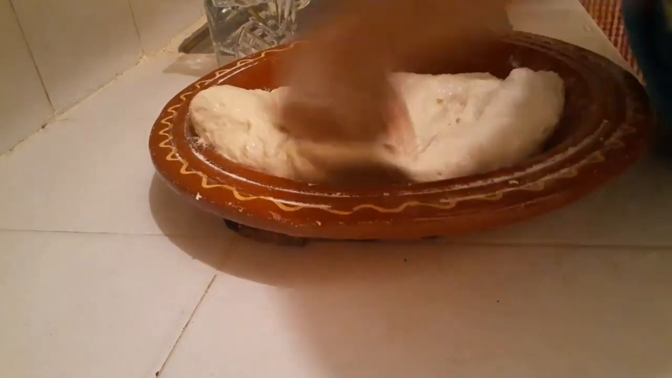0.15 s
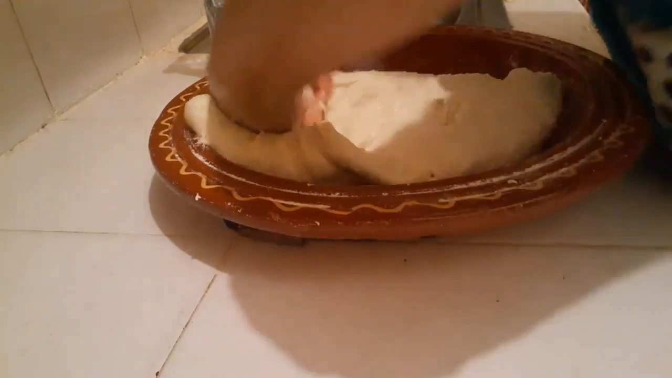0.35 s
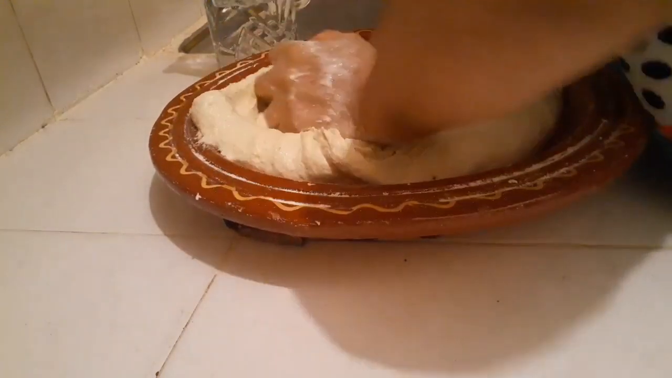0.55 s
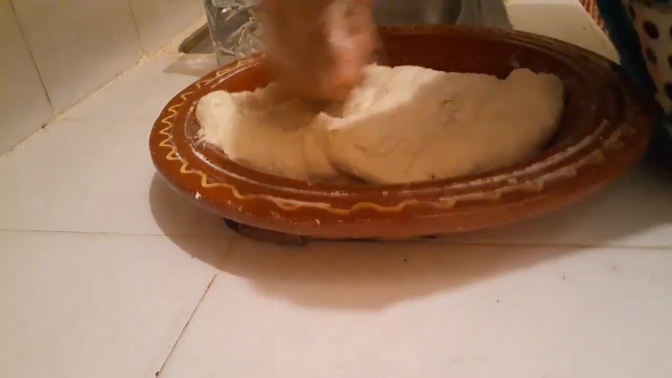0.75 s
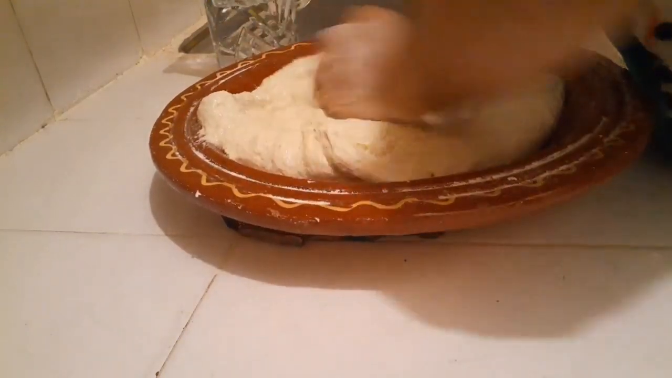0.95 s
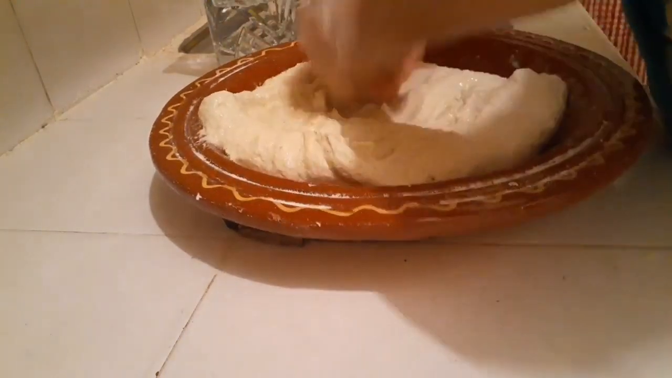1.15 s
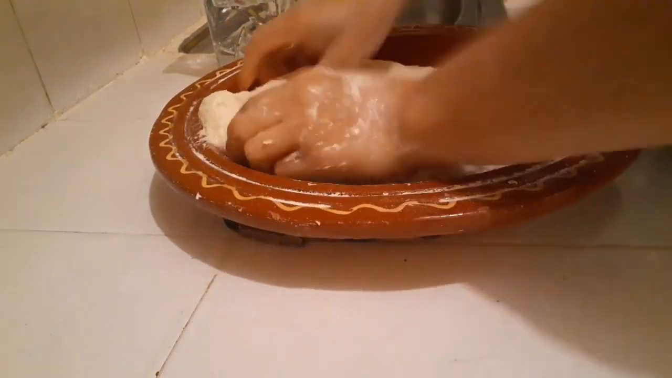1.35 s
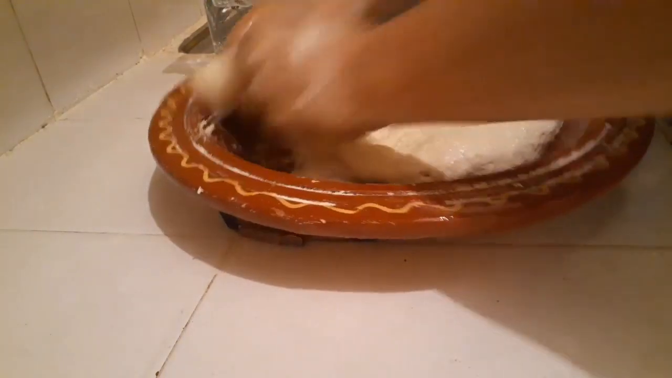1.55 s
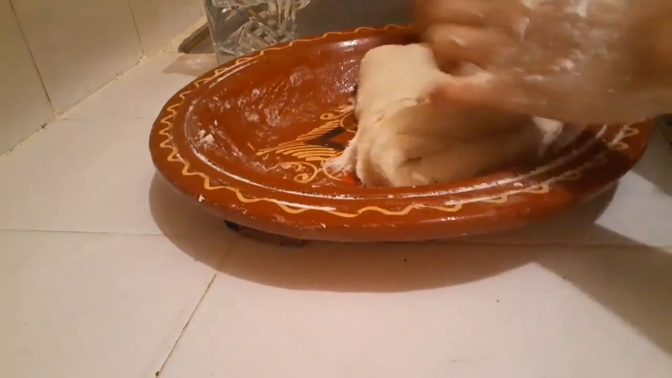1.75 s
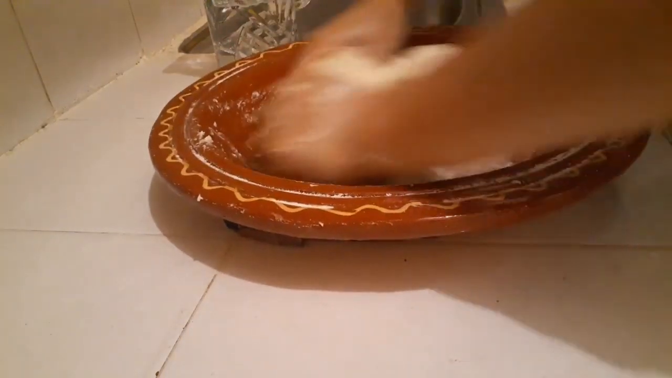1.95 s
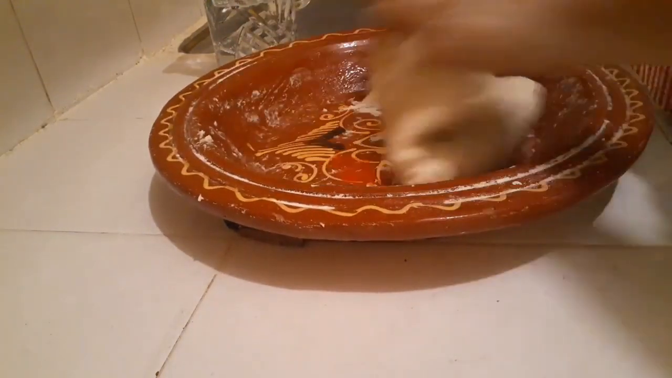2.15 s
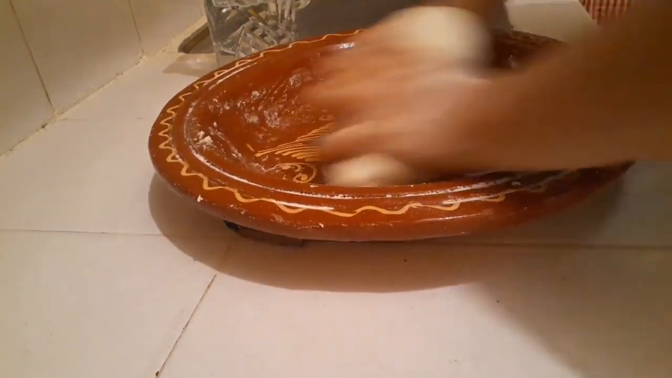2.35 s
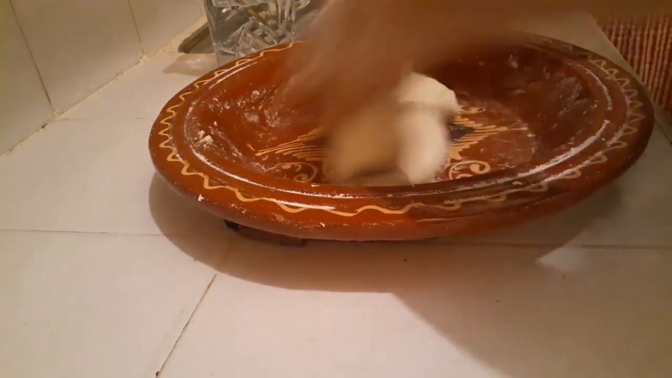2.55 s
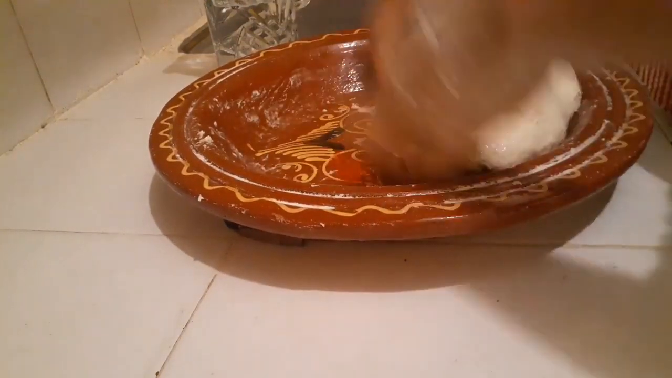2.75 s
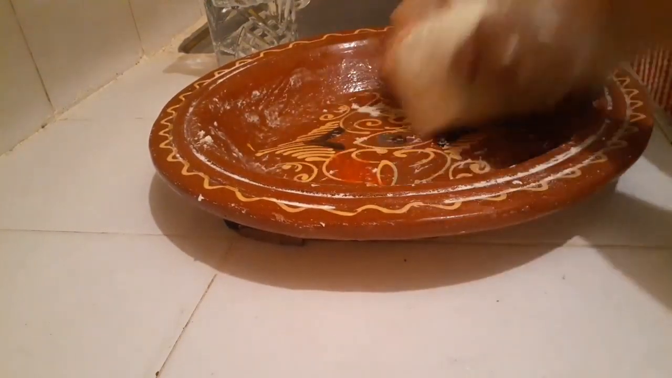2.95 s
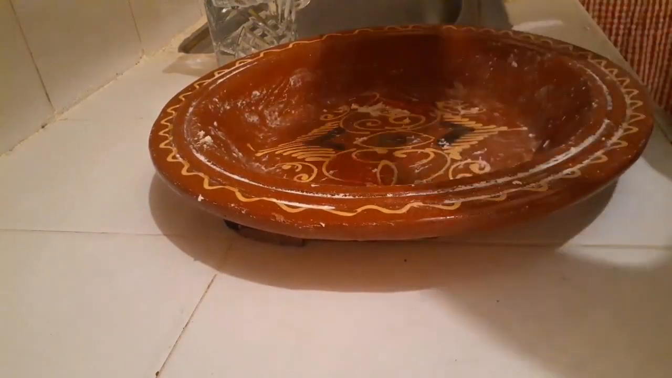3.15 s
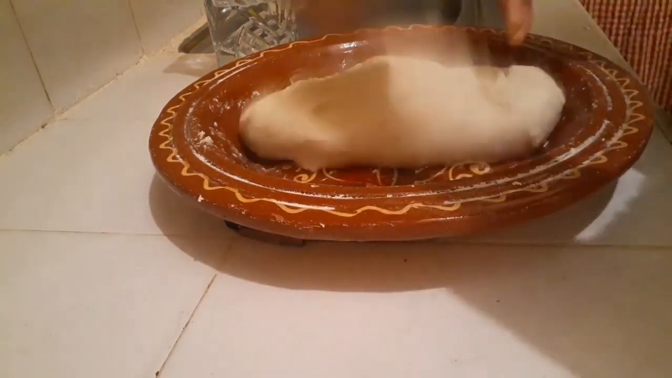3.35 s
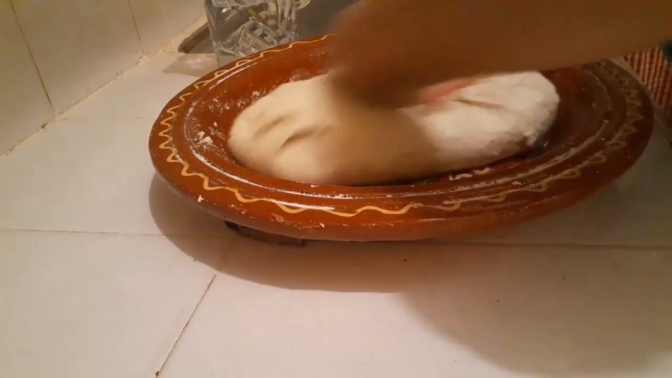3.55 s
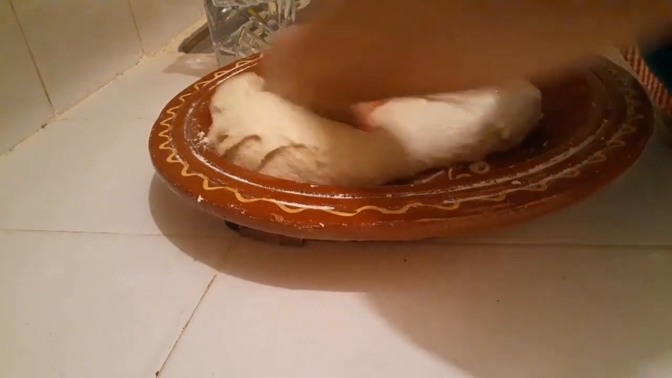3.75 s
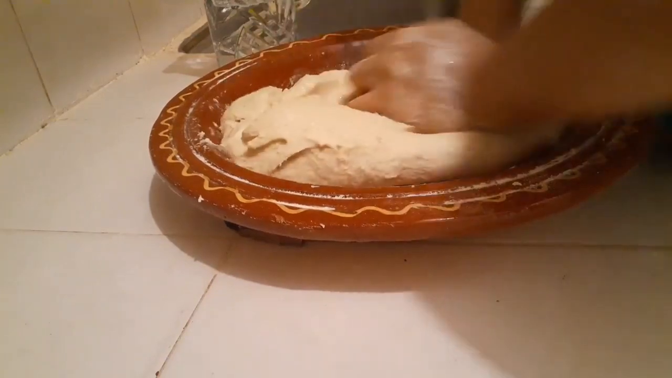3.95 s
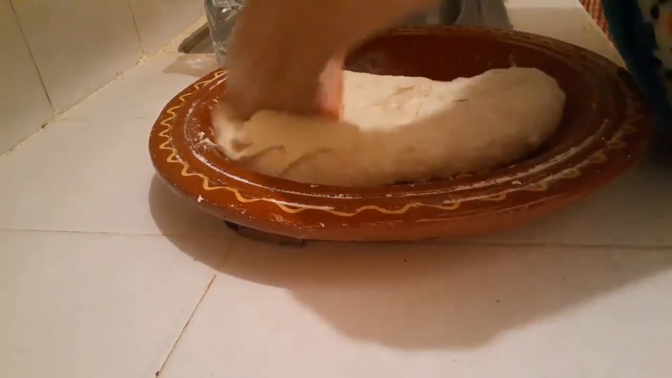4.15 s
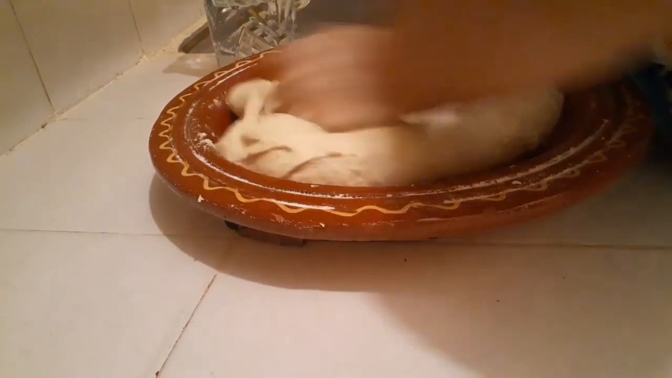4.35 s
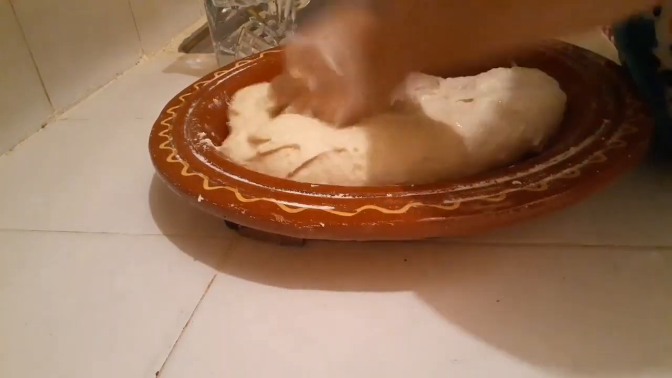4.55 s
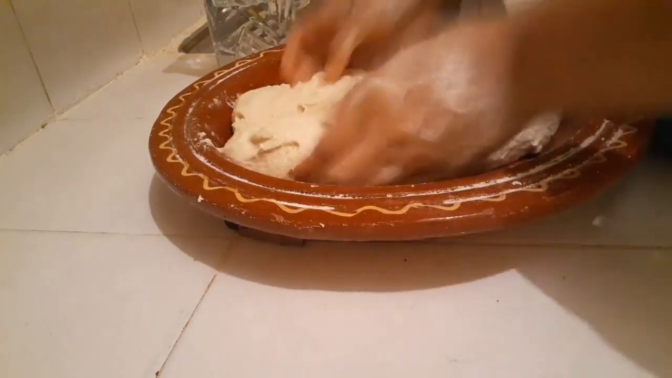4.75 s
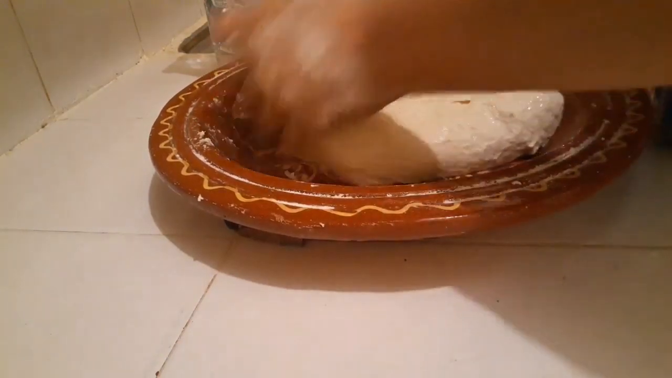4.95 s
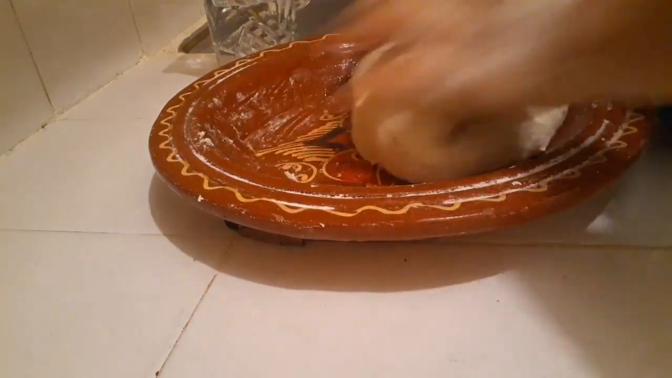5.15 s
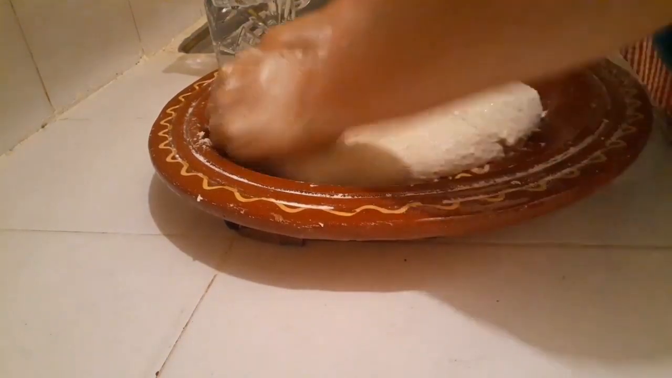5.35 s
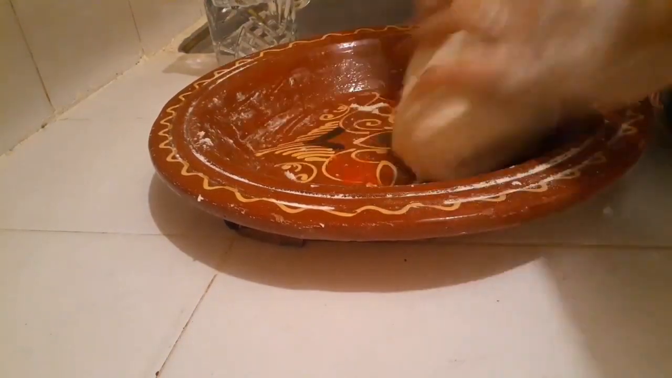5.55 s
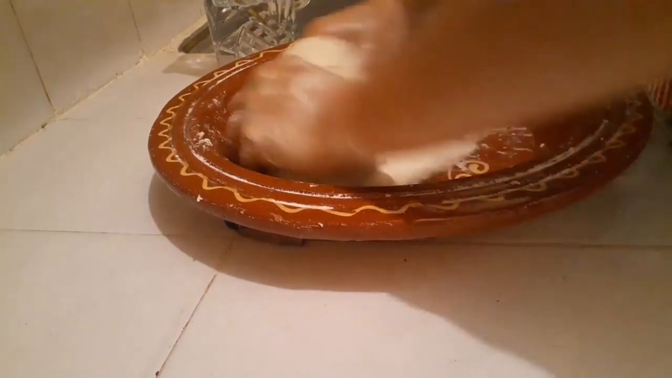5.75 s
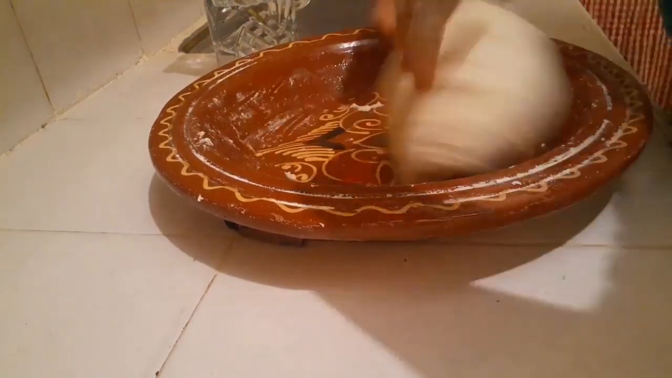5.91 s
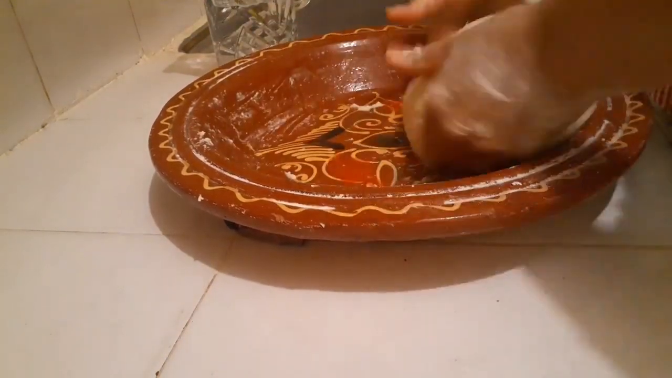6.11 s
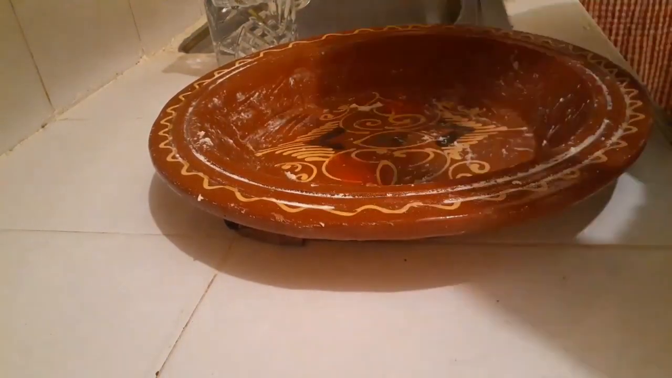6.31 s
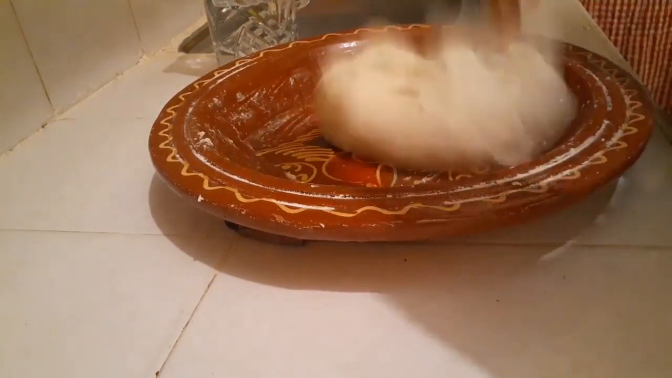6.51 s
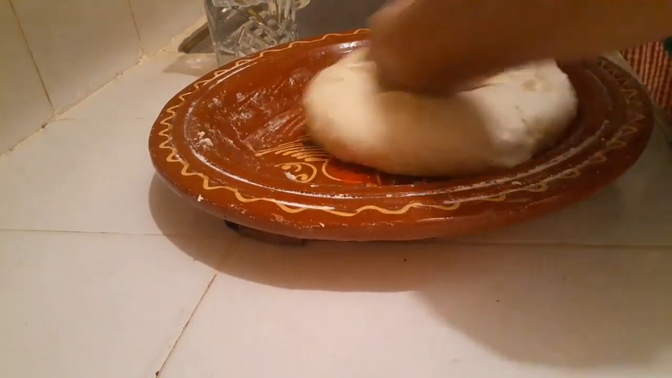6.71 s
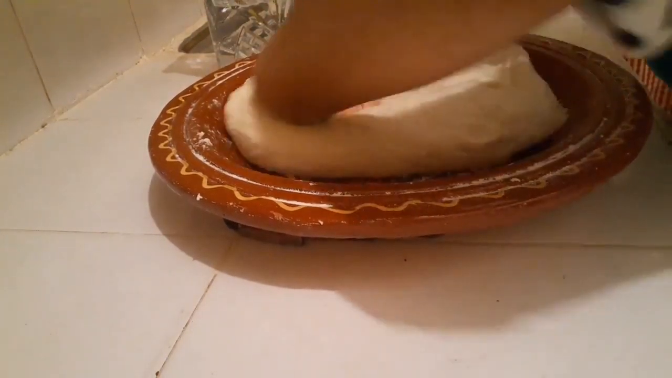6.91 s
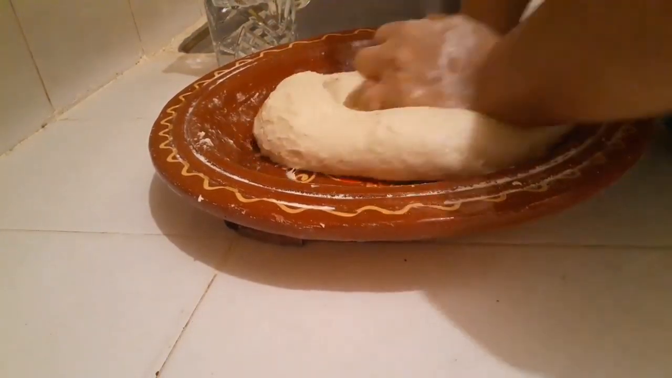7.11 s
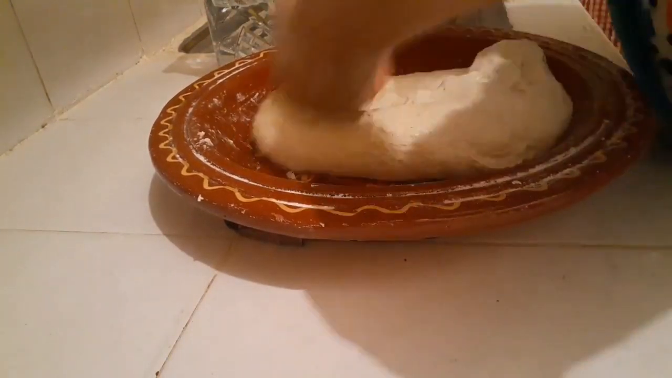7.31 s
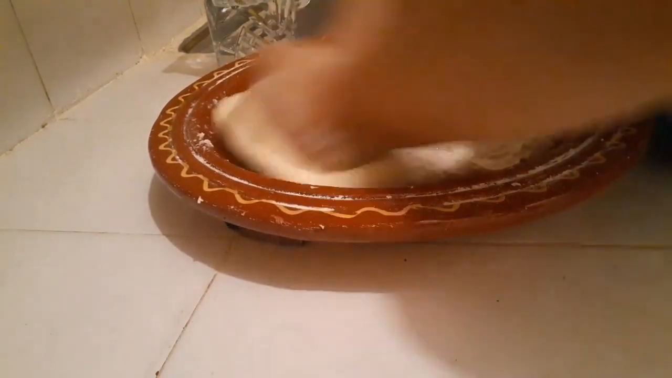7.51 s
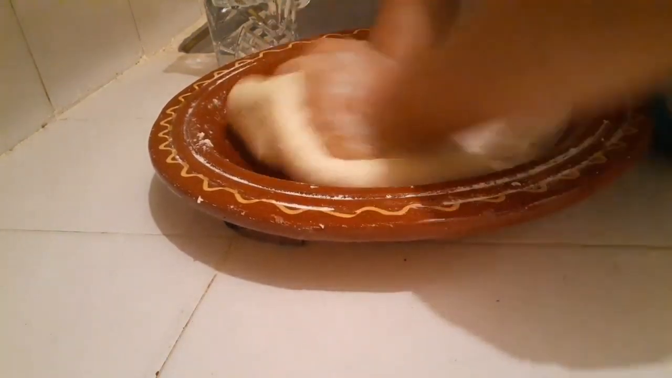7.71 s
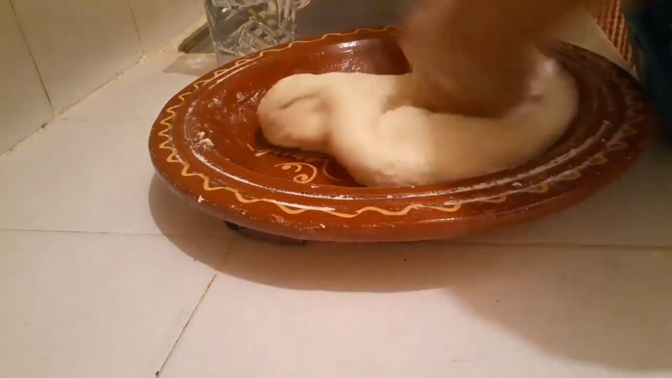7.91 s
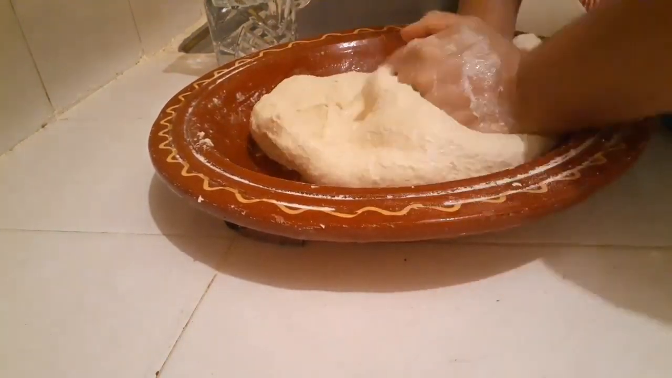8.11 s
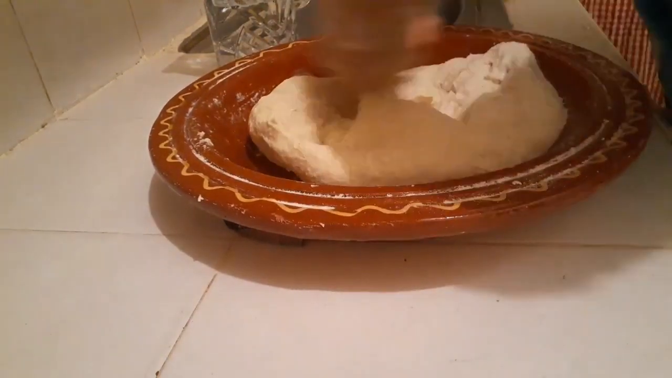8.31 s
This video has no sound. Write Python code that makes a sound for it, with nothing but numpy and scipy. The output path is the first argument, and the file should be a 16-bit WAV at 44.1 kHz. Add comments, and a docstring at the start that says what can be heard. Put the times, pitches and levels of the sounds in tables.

```python
"""Kneading sticky dough

Hands work dough in a clay dish on a tiled kitchen counter, close to a small camera's microphone.
Each stroke peels the dough with a fine crackle, a wet squelch and a few snaps. Fists and the dropped
lump thump the dish, and a palm rubs the glaze. Tiles and walls answer over a faint kitchen hush."""
import sys
import numpy as np
from scipy import signal
from scipy.fft import rfft, irfft, next_fast_len
from scipy.io import wavfile
from scipy.ndimage import uniform_filter1d

SR = 44100
rng = np.random.default_rng(int(sys.argv[2]) if len(sys.argv) > 2 else 0)


def unload_wav(signal):
    """Save mono or channel-first audio to the path in sys.argv[1] as 16-bit WAV at rate SR, clipped to [-1, 1]."""
    wavfile.write(
        sys.argv[1],
        SR,
        np.round(np.clip(np.atleast_2d(signal).T, -1, 1) * 32767).astype(np.int16),
    )


N = 373527

# room modes below 250 Hz, modes of the dish above: f/Hz, level/dB, t60/s
MODES = [(87.36, 0, 0.98), (109, -12, 0.99), (140.8, -2, 0.44), (184.8, -3, 0.4), (233.4, -4.5, 0.15),
         (293.2, -17, 0.7), (339, -1, 0.2), (387.4, -3, 0.12), (434, 0, 0.075), (482.7, -4, 0.14),
         (542.4, 2.5, 0.081), (641.7, -5, 0.18), (736, -1, 0.074), (853.6, 1.5, 0.081), (917, 0.5, 0.075),
         (1148, 1.5, 0.061), (1220, -4, 0.055), (1346, -5, 0.11), (1560, -8.5, 0.12), (1937, -5.5, 0.029),
         (2240, -14, 0.082)]
# bright spectrum of tearing dough: f/Hz, level/dB
PEEL_SPECTRUM = [(1500, -23.5), (3000, -16), (6000, -8.5), (12000, -4.5), (16000, -1)]


def amp(db):
    """Gain of a dB value."""
    return 10 ** (np.asarray(db) / 20)


def unit(x):
    """Scaled to rms 1."""
    return x / np.sqrt(np.mean(x ** 2) + 1e-20)


def along(points, hz):
    """A curve through (frequency, value) points, read on a log axis."""
    f, v = np.transpose(points)
    return np.interp(np.log(hz + 1), np.log(f + 1), v)


def filtered(x, response):
    """x through a complex frequency response."""
    m = next_fast_len(N + SR)
    return irfft(rfft(x, m) * response(np.fft.rfftfreq(m, 1 / SR)), m)[..., :N]


def eq(x, curve, gain_db=0):
    """x coloured by a curve of f/Hz, level/dB."""
    return filtered(x, lambda hz: amp(along(curve, hz) + gain_db))


def stereo_noise(length=N):
    """White noise, independent left and right."""
    return rng.standard_normal((2, length))


def hush():
    """Faint, steady room tone."""
    spectrum = [(18, -38.5), (30, 1), (107, -4.5), (255, -10), (340, 2), (1030, -7), (7280, -20),
                (12000, -13.5), (14800, -18.5), (16500, -41)]  # the quiet kitchen: f/Hz, level/dB
    return amp(-71) * unit(eq(stereo_noise(), spectrum))


def stroke_envelopes():
    """Each stroke swells as the hand arrives, holds, then fades; overlapping strokes add in power."""
    # hand strokes: full contact t/s, approach/s, hold/s, peel/dB, squelch/dB, push/dB, rumble/dB
    gestures = [(0.0, 0.044, 0.0092, -48, -49, -51.5, -53), (0.134, 0.056, 0.055, -46, -42, -48.0, -55),
                (0.235, 0.11, 0.1, -77.5, -50, -56, -63), (0.407, 0.052, 0.029, -56.5, -60, -67, -71),
                (0.473, 0.021, 0.012, -39.5, -39.5, -52, -59), (0.647, 0.035, 0.024, -47.5, -55, -51, -57),
                (0.695, 0.016, 0.0088, -39, -39.5, -48, -59), (0.894, 0.45, 0.02, -58.5, -56.5, -61.5, -59),
                (0.945, 0.023, 0.0136, -35.5, -50, -55, -60), (1.026, 0.063, 0.031, -78, -63, -54.5, -47.5),
                (1.089, 0.03, 0.012, -60, -36.0, -42.5, -48.0),
                (1.144, 0.06, 0.017, -44.0, -45.5, -52, -47), (1.324, 0.15, 0.14, -65, -59.0, -54.5, -60),
                (1.542, 0.163, 0.05, -41.5, -47.5, -58, -66), (1.616, 0.033, 0.056, -46.5, -59, -27.5, -33),
                (1.727, 0.054, 0.0065, -51, -45, -38, -36.0),
                (1.896, 0.099, 0.063, -47.5, -47.5, -50.5, -48.5),
                (2.092, 0.19, 0.051, -44.5, -51.5, -59, -60), (2.359, 0.26, 0.071, -52.5, -59.5, -59, -60),
                (2.551, 0.16, 0.058, -43.5, -53, -57.5, -70), (2.677, 0.018, 0.024, -56, -50.0, -45, -46),
                (2.784, 0.026, 0.014, -64, -57, -55, -52), (2.919, 0.13, 0.092, -44.5, -49.5, -61.5, -63),
                (3.162, 0.18, 0.048, -55.5, -70.0, -63, -70), (3.268, 0.19, 0.049, -56.5, -80, -65, -72),
                (3.346, 0.0079, 0.08, -47, -48, -46, -32.5), (3.609, 0.23, 0.036, -58.0, -59.5, -69, -54.0),
                (3.806, 0.054, 0.0087, -43.0, -54, -62, -56), (3.848, 0.059, 0.01, -45, -43.5, -49, -47.5),
                (3.992, 0.045, 0.059, -46, -48, -56, -58), (4.183, 0.056, 0.015, -48, -52.5, -68, -83),
                (4.238, 0.046, 0.011, -48, -68.0, -81, -80),
                (4.324, 0.027, 0.028, -36, -43.5, -51.5, -52.5),
                (4.527, 0.047, 0.053, -48, -46.0, -51.5, -52.0),
                (4.744, 0.014, 0.04, -70, -63.5, -63, -57.5), (4.93, 0.22, 0.11, -48.5, -55.5, -59.5, -69),
                (5.234, 0.24, 0.017, -55.5, -56.5, -59.0, -61),
                (5.281, 0.11, 0.035, -48, -64, -52.5, -53.5), (5.427, 0.1, 0.057, -42.5, -50, -52, -61),
                (5.589, 0.058, 0.026, -63.0, -67.0, -57, -55),
                (5.648, 0.049, 0.0086, -44, -53.5, -58.5, -50),
                (5.723, 0.049, 0.018, -52.5, -67, -71.0, -59), (5.845, 0.1, 0.05, -41.0, -48, -60.0, -68.0),
                (5.95, 0.022, 0.043, -64, -57, -55, -54.0), (6.173, 0.19, 0.04, -48.5, -52.5, -61.5, -65),
                (6.338, 0.128, 0.036, -51, -58.5, -70, -75), (6.462, 0.086, 0.042, -48, -72, -79, -80),
                (6.52, 0.017, 0.038, -44.0, -40, -34.5, -41), (6.818, 0.7, 0.08, -60.5, -58, -59.5, -62),
                (7.013, 0.1, 0.019, -42.0, -41, -42, -48), (7.193, 0.032, 0.047, -45, -55, -57, -73),
                (7.366, 0.018, 0.11, -61.5, -61, -92, -73.0), (7.533, 0.039, 0.017, -34, -39.5, -51, -57),
                (7.73, 0.036, 0.056, -46.5, -46, -46, -47), (7.791, 0.14, 0.013, -41, -51, -60, -65),
                (8.029, 0.23, 0.065, -58.5, -78, -79.0, -67.5), (8.238, 0.036, 0.049, -43, -43, -45.5, -56),
                (8.402, 0.043, 0.046, -70, -52.5, -52.5, -59)]
    # fade after the hand lets go, each in dB/s: peel, squelch, push, rumble
    fade_rates = [260, 248, 212, 136]
    contact, approach, hold, *levels = np.transpose(gestures)[:, :, None]
    t = np.arange(0, N, 44) / SR
    swell_db = -30 * np.clip(contact - t, 0, None) / approach
    released_s = np.clip(t - contact - hold, 0, None)
    envelopes = []
    for db, fade in zip(levels, fade_rates):
        power = (amp(db + swell_db - fade * released_s) ** 2).sum(axis=0)
        envelopes.append(amp(np.interp(np.arange(N) / SR, t, 10 * np.log10(power + 1e-12))))
    return envelopes


def crackle(tears_per_s, spread_db, spectrum):
    """Tiny threads of dough tear at random, each a grain of noise heard on both sides at once."""
    tears = (rng.random(N) < tears_per_s / SR) * amp(spread_db * rng.standard_normal(N))
    grains = np.sqrt(np.abs(signal.lfilter([1], [1, -.95], tears ** 2)))
    return eq(grains * stereo_noise(), spectrum)


def patchy(x, depth_db):
    """Random passing patches, a few hundred Hz wide, colour the noise."""
    spectra = signal.stft(x, nperseg=256)[2]
    patches = uniform_filter1d(rng.standard_normal(spectra.shape[1:]), size=2, axis=0)
    patches = uniform_filter1d(patches, size=10, axis=1)
    return unit(signal.istft(spectra * amp(depth_db * unit(patches)), nperseg=256)[1][:, :N])


def dish(force):
    """A force on the dish rings the modes; the faster a mode dies, the broader it is."""
    def response(f):
        return sum((-1) ** k * amp(db) * 1j * f * 100
                   / (hz * hz - f * f + 1j * f * np.log(1000) / (np.pi * t60))
                   for k, (hz, db, t60) in enumerate(MODES))
    return filtered(force, response)


def strokes():
    """Dough peels and squelches while the hand's uneven push shakes dish and counter."""
    squelch_spectrum = [(300, -5), (800, 1.5), (1400, 2), (2400, 1.5), (4000, 0.5), (7000, -10),
                        (12000, -11.5)]  # squeezed wet dough: f/Hz, level/dB
    rumble_spectrum = [(40, -31), (70, -6.5), (86, -5.5), (130, -3.5), (183, -7.5), (240, -8.5), (300, -50)]  # the shaken counter: f/Hz, level/dB
    peel_gain, squelch_gain, push_gain, rumble_gain = stroke_envelopes()
    peel = patchy(crackle(tears_per_s=3500, spread_db=3.5, spectrum=PEEL_SPECTRUM), depth_db=2)
    squelch = patchy(crackle(tears_per_s=4000, spread_db=3, spectrum=squelch_spectrum), depth_db=4)
    force = filtered(stereo_noise(), lambda hz: (hz > 260) / (1 + (hz / 420) ** 2))
    push = unit(dish(force))
    rumble = unit(eq(stereo_noise(), rumble_spectrum))
    return peel_gain * peel + squelch_gain * squelch + push_gain * push + rumble_gain * rumble


def thumps():
    """Blows ring dish and room, dough damps the dish, wet skin splats. Returns ring, splat."""
    # fists and the dropped lump: t/s, boom/dB, low/dB, body/dB, upper body/dB, high ring/dB,
    # damping by dough/ratio, slap/dB, spray/dB
    blows = [(0.113, -56, -71, -47, -41, -43.5, 0.98, -58, -45),
             (0.655, -48, -53, -54, -46, -41, 1.2, -34.5, -32),
             (1.086, -48, -47, -35, -40, -37.5, 1.15, -32, -54),
             (1.614, -58, -22, -20.5, -15, -21.5, 1.32, -60, -48.5),
             (1.642, -40, -18.5, -21.5, -15.5, -41, 2.3, -59, -50),
             (1.735, -45.5, -40, -26, -28.5, -23.5, 2.9, -44, -56),
             (1.872, -63.5, -43, -35.5, -47, -41, 1.6, -35, -40),
             (2.353, -68, -65, -48, -59, -83, 0.65, -50, -43),
             (2.669, -56.5, -50, -34.5, -48, -43, 0.67, -36, -29.5),
             (2.788, -52, -51.5, -40.5, -52, -54, 2, -55, -44),
             (3.34, -57.5, -43, -26.5, -27.5, -51, 0.59, -48, -42),
             (3.348, -37.5, -22, -29, -36, -18, 3.7, -17.5, -12.5),
             (3.352, -33, -36, -16.5, -20.5, -13, 1.67, -10.5, -18.5),
             (3.992, -75, -57, -42, -49, -55, 1.9, -34.5, -51),
             (4.524, -57.5, -44, -32.5, -37, -48.5, 1.44, -34.5, -37.5),
             (4.745, -68, -61.5, -53, -59, -65.5, 0.59, -47.5, -53),
             (4.948, -73.5, -62.5, -48.5, -56, -41, 1.4, -48, -56),
             (5.281, -69, -47, -55, -58, -54, .6, -62, -58), (5.582, -68, -46, -47, -66, -66, .6, -71, -60),
             (5.946, -56, -73, -60, -55, -48, 0.65, -39, -36.5),
             (6.508, -43, -32, -39, -52, -44, 3, -19.5, -14),
             (6.512, -28, -24.5, -24.5, -30, -15.5, 1.3, -12, -31.5),
             (6.998, -54, -44, -36, -43, -37.5, 1.06, -38, -38),
             (7.367, -77, -75, -77, -88, -57, 0.77, -44.5, -58),
             (7.542, -56, -45, -45.5, -46, -57, 0.73, -41, -39),
             (7.723, -52, -41, -32.5, -53, -61, 1.17, -47, -54.5),
             (8.221, -60.5, -46.5, -35, -55, -38, 1.3, -57, -57),
             (8.396, -58.5, -56, -45.5, -62, -50, 1.8, -43, -48)]
    band_centres = [95, 185, 336, 550, 1300]  # the five bands from boom to high ring: f/Hz
    hz, mode_db, t60 = np.transpose(MODES)[:, :, None]
    t = np.arange(SR * 3 // 4) / SR
    is_room_mode = hz < 250  # low room modes build up slowly and boom on
    rise = 1 - np.exp(-t * hz / np.where(is_room_mode, 1.6, .4))
    sine, cosine = rise * np.sin(2 * np.pi * hz * t), rise * np.cos(2 * np.pi * hz * t)
    contact = amp(-30 * t[:4000] / .016) * (1 - np.exp(-t[:4000] / .0005))  # 30 dB down in 16 ms
    ring, slap, spray = np.zeros((3, 2, N + SR))
    for onset, *band_db, damping, slap_db, spray_db in blows:
        start = round(onset * SR)
        dough_loss = np.where(is_room_mode, 1, damping ** (1 + (hz / 2000) ** 2))
        fade = np.exp(-np.log(1000) * t * dough_loss / t60)
        level_db = mode_db + along(list(zip(band_centres, band_db)), hz)
        gain = amp(level_db + rng.normal(0, 1.5, hz.shape))
        phase_spread = rng.normal(0, 1, hz.shape) * hz / 900  # left and right part more in high modes
        mid = (gain * np.cos(phase_spread)).T @ (fade * sine)
        side = (gain * np.sin(phase_spread)).T @ (fade * cosine)
        ring[:, start:start + len(t)] += mid + side * [[1], [-1]]
        for layer, db in (slap, slap_db), (spray, spray_db):
            layer[:, start:start + len(contact)] += amp(db) * contact * stereo_noise(len(contact))
    slap_spectrum = [(500, -14.5), (1200, 3), (2500, -2.5), (5000, -6.5), (8000, -14), (16000, -30.5)]  # the smack of wet skin: f/Hz, level/dB
    splat = eq(slap[:, :N], slap_spectrum, gain_db=6) + eq(spray[:, :N], PEEL_SPECTRUM, gain_db=4.5)
    return ring[:, :N], splat


def snaps():
    """The dough's skin tears with a thin tick, and an air pocket pops with a short, rough ring."""
    pockets = [(0.147, -19.5, -45.5, 1350), (0.177, -36, -40.5, 1400), (0.2553, -23, -58, 3620),
               (0.408, -37, -65, 4060), (0.4583, -19, -53, 5500), (0.4765, -36, -42, 2300),
               (0.4922, -24.5, -41, 2310), (0.6564, -19, -40, 3410), (0.661, -29, -40, 1313),
               (0.6969, -27, -31, 2087), (0.7098, -22, -41, 2060), (0.93, -25, -58, 3970),
               (0.9491, -21, -46, 4200), (0.959, -30, -45, 5180), (1.0908, -38, -31, 2240),
               (1.166, -21, -47.5, 2380), (1.5345, -20, -58, 1730), (1.879, -16.5, -40.5, 1220),
               (1.9242, -43, -50, 2170), (2.0701, -34, -54, 4060), (2.1094, -39, -50, 4120),
               (2.668, -24, -45.5, 2230), (2.787, -33, -68, 2170), (2.913, -22, -53, 4170),
               (2.9872, -30, -49, 3550), (2.999, -29.5, -49.5, 1370), (3.7988, -20.5, -61.5, 1870),
               (3.979, -29, -47, 2460), (3.9984, -38, -47.5, 1215), (4.18, -39, -50.5, 5200),
               (4.2428, -21.5, -70, 5800), (4.32, -14, -58, 5560), (4.524, -25.5, -39, 2130),
               (4.9158, -26, -54, 1710), (5.2693, -23, -64, 2150), (5.2885, -28.5, -60, 1520),
               (5.444, -23, -50.5, 4050), (5.6514, -26, -60, 5940), (5.8484, -55, -57, 3880),
               (5.949, -50, -56, 1550), (6.1859, -16.5, -64, 5630), (6.1958, -23, -63, 5900),
               (6.5259, -4.5, -31, 1320), (7.0051, -29, -35.5, 2190), (7.4243, -49, -52.5, 5300),
               (7.5205, -26, -50.5, 3330), (7.5346, -27.5, -57, 2690), (7.5492, -21, -45, 4370),
               (7.5601, -20, -46, 4670), (7.7272, -43, -46, 1102), (7.8044, -23, -50.5, 5030),
               (8.0244, -31.5, -55, 5200), (8.2228, -40, -39.5, 2530), (8.258, -29, -45, 1275),
               (8.395, -51, -53, 2940), (8.4322, -35, -55, 3220)]  # sticky snaps: t/s, tick/dB, pop/dB, pop f/Hz
    t60_cycles, roughness, tick_s = 28, .7, .0006
    t = np.arange(2000) / SR
    pops, ticks = np.zeros((2, 2, N + len(t)))
    for onset, tick_db, pop_db, hz in pockets:
        pan = amp(np.array([[.5], [-.5]]) * rng.standard_normal())
        phase = rng.uniform(0, 2 * np.pi, (2, 1))
        ring = np.sin(2 * np.pi * hz * t + phase) * amp(-60 * t * hz / t60_cycles)
        flutter = unit(uniform_filter1d(stereo_noise(len(t)), size=int(3 * SR / hz)))
        pop = ring * (1 - np.exp(-t * hz)) * (1 - roughness + roughness * flutter)
        tick = (t / tick_s) ** 2 * np.exp(-t / tick_s) * stereo_noise(len(t))
        start = round(onset * SR)
        span = slice(start, start + len(t))
        pops[:, span] += pan * amp(pop_db) * pop / np.sqrt(np.mean(pop[:, :600] ** 2))
        ticks[:, span] += pan * amp(tick_db) * tick / np.abs(tick).max(axis=1, keepdims=True)
    return pops[:, :N] + eq(ticks[:, :N], PEEL_SPECTRUM)


def rubs():
    """A palm slides on the glaze: soft friction swells and sings in two narrow bands."""
    slides = [(0.723, .2, -73), (1.2, 0.69, -63), (6.775, 0.31, -64), (7.354, 0.1, -59.5)]  # slow palm rubs: t/s, length/s, level/dB
    glaze_bands = [(1450, 55, -3), (2370, 50, 5.5)]  # where the glaze sings: f/Hz, width/Hz, level/dB
    t = np.arange(N) / SR
    swell = sum(amp(db) * np.sqrt(np.sin(np.pi * np.clip((t - onset) / length, 0, 1)))
                for onset, length, db in slides)

    def response(f):
        return sum(amp(db) / (1 + ((f - hz) / width) ** 2) for hz, width, db in glaze_bands)
    return swell * unit(filtered(stereo_noise(), response))


def kitchen(send):
    """Tiles and walls answer with a short tail in which each frequency dies at its own speed."""
    decay_times = [(100, 0.32), (500, 0.45), (2000, 0.33), (8000, 0.3), (15000, 0.1)]  # the room's reverb: f/Hz, t60/s
    hz, t, spectra = signal.stft(stereo_noise(SR // 2), SR, nperseg=256)
    fade = amp(-60 * t / along(decay_times, hz)[:, None])
    tail = signal.istft(spectra * fade, SR, nperseg=256)[1]
    predelayed = np.pad(send, ((0, 0), (150, 0)))
    return signal.fftconvolve(predelayed, tail / np.linalg.norm(tail[0]), axes=1)[:, :N]


def mic_ports(pair):
    """The two ports share the lows but not the treble; the left is slightly louder."""
    likeness = [(60, 0.86), (200, 0.76), (550, 0.7), (1500, 0.0077), (15000, 0.0082)]  # left-right likeness: f/Hz, correlation

    def angle(hz):
        return np.arcsin(along(likeness, hz)) / 2
    direct = filtered(pair, lambda hz: np.cos(angle(hz)))
    crossfeed = filtered(pair[::-1], lambda hz: np.sin(angle(hz)))
    return (direct + crossfeed) * amp([[.9], [-.9]])


def scene():
    """Thumps and snaps feed the room; strokes and rubs stay dry over the hush."""
    ring, splat = thumps()
    snap = snaps()
    room = kitchen(amp(-9.5) * ring + amp(-6) * splat + amp(-7) * snap)
    return mic_ports(ring + splat + snap + room + strokes() + rubs() + hush())


def record(dry):
    """A small microphone with a treble dip and peak, cut off at 16.6 kHz."""
    mic_curve = [(20, -24.5), (50, -0.5), (80, -7), (6000, 1.5), (7500, 0.5), (8800, 9), (10500, 5),
                 (14000, 3), (15500, -8), (16200, -27.5)]  # microphone response: f/Hz, level/dB
    return filtered(dry, lambda hz: amp(along(mic_curve, hz)) * (hz < 16600))


dry = scene()
out = record(dry)
unload_wav(out)
```